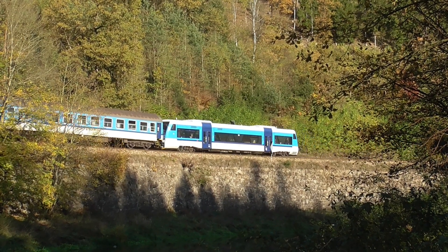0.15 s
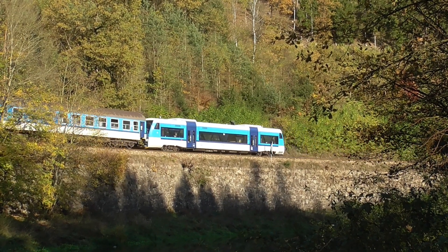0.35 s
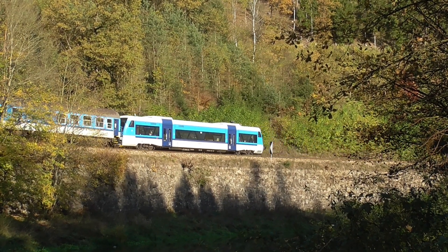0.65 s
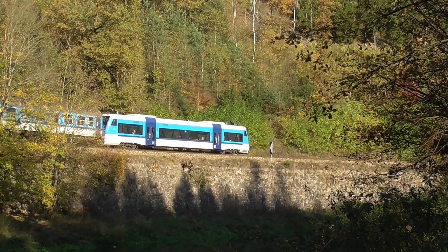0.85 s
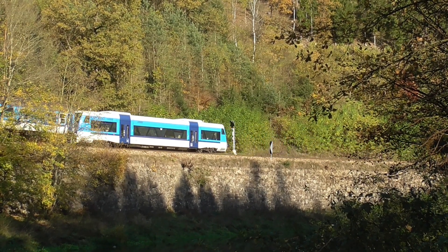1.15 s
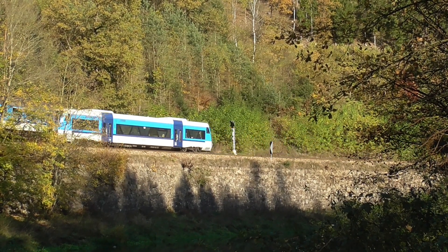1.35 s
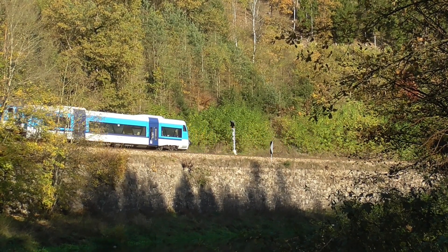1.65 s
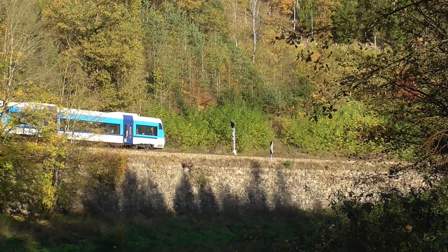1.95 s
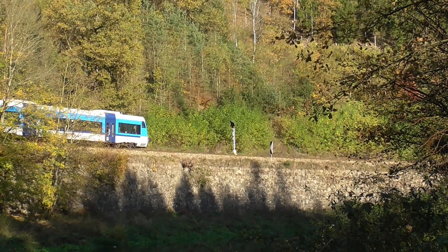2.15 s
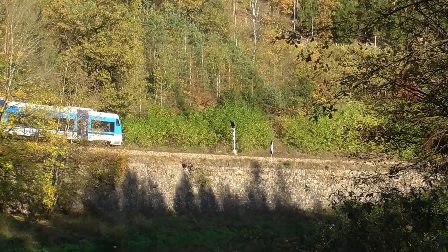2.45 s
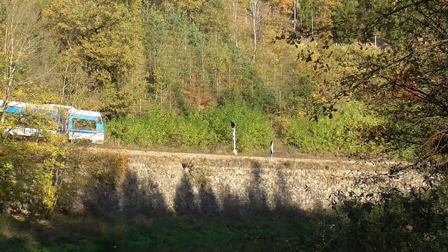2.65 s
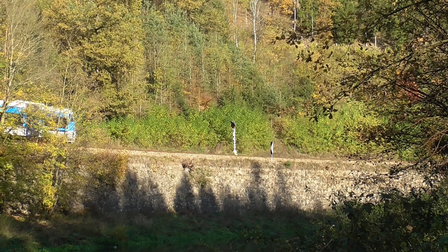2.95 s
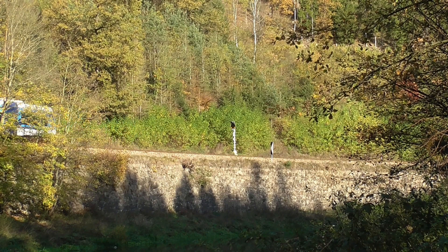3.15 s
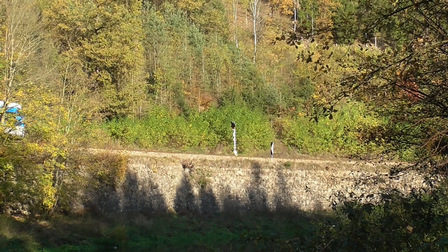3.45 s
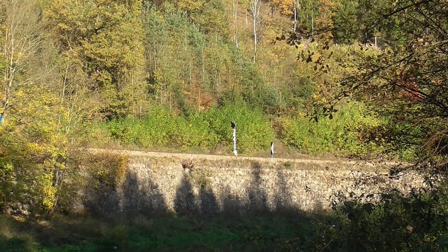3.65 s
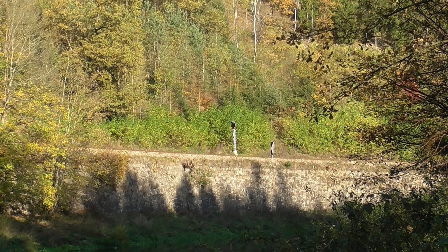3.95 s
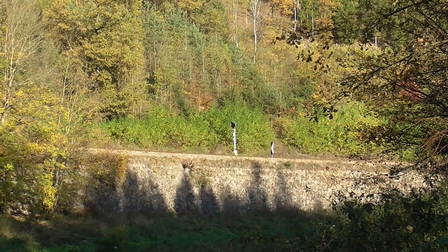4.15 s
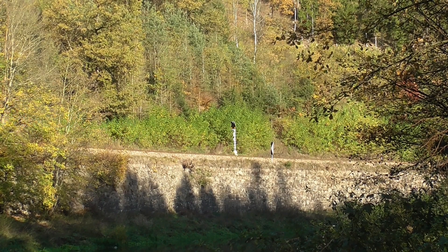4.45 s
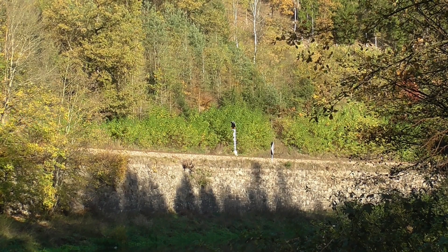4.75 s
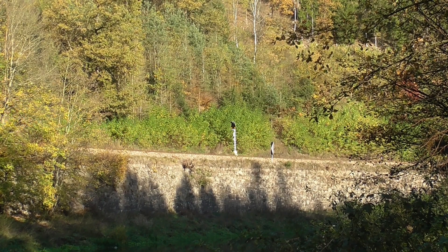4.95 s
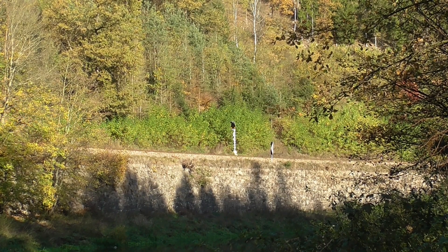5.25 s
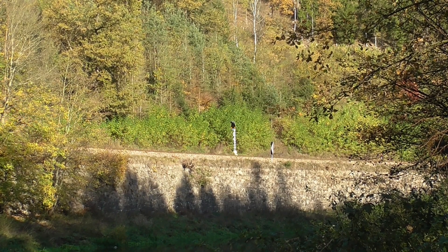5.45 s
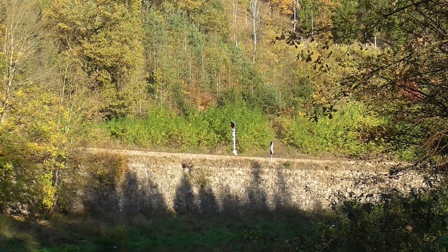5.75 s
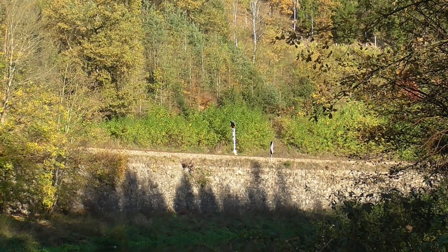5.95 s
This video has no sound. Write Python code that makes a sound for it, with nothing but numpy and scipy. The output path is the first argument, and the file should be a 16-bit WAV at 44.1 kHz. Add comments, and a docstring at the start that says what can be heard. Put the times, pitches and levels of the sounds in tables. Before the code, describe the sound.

Wheel flanges sing and screech through an echoing forest while a diesel drones and rolling rumble grows; the squeal jumps much higher halfway through.

```python
"""Diesel train on a tight curve

Across a wooded valley, slipping wheels sing in several self-excited modes, and brief chirps join them.
The trees scatter each sustained tone into a rough Doppler halo; near paths beat with it.
A diesel drones in harmonics of its firing rate. Coloured noises make the rumble, roar, boom and rolling,
and flange friction hisses through wheel resonances; the train grows louder as it comes nearer."""
import sys
import numpy as np
from scipy import signal
from scipy.fft import rfft, irfft
from scipy.io import wavfile
from scipy.ndimage import uniform_filter1d, map_coordinates

SR = 44100
rng = np.random.default_rng(int(sys.argv[2]) if len(sys.argv) > 2 else 0)


def unload_audio(sound):
    """Save the sound as a 16-bit wav file, at the path given as the first command line argument."""
    columns = np.transpose(np.atleast_2d(sound))
    # keep every value between -1 and 1, then stretch to whole-number steps
    steps = np.round(np.clip(columns, -1, 1) * 32767)
    wavfile.write(sys.argv[1], SR, steps.astype(np.int16))


N = 269010
TIME = np.arange(N) / SR
FREQ = np.maximum(np.fft.rfftfreq(N, 1 / SR), 1)


def undb(db):
    """Logarithmic level law: decibels to amplitude gain."""
    return 10 ** (np.asarray(db) / 20)


def unit(x):
    """Power normalisation: scale to rms 1."""
    return x / np.sqrt(np.mean(np.abs(x) ** 2))


def curves(table):
    """Linear interpolation in time of each column, with corners rounded by a 50 ms moving average."""
    s, *columns = np.transpose(table)
    return [uniform_filter1d(np.interp(TIME, s, column), size=SR // 20) for column in columns]


def across(table, hz=FREQ):
    """Linear interpolation of a table on a logarithmic frequency axis."""
    f, value = np.transpose(table)
    return np.interp(np.log(hz), np.log(f), value)


def scatter(gain):
    """Superposition of countless echoes, weighted by frequency shift: a complex envelope of rms 1."""
    random_phases = np.exp(2j * np.pi * rng.random(len(gain)))
    return unit(np.fft.ifft(gain * random_phases))


def fading(width_hz):
    """Beating of paths with nearly the same Doppler shift: a slow complex envelope."""
    beat_hz = np.fft.fftfreq(N // 64, 64 / SR)
    slow = scatter(np.exp(-.5 * (beat_hz / width_hz) ** 2))
    return np.interp(TIME, np.linspace(0, TIME[-1], len(slow)), slow)


def walk(rate):
    """Band-limited Gaussian fluctuation of rms 1, changing about rate times a second."""
    return unit(fading(rate).real)


# likeness of left and right for a sound fully aside: pitch_hz, likeness (0-1)
LIKENESS = [(40, .92), (130, .98), (300, .96), (700, .91), (1300, .8), (2200, .58), (4500, .45),
            (7500, .34), (10000, .22), (15000, .25)]
# level difference for a sound fully aside: pitch_hz, left_minus_right_db
BALANCE = [(60, 0.5), (300, 0), (700, 2), (2400, 4.5), (4400, 3), (6000, 0), (8000, 0), (15000, -1)]
# phase difference for a sound fully aside: pitch_hz, left_lead_rad
LEAD = [(40, 0), (250, .1), (700, .65), (1400, .8), (2500, 1.0), (4600, 1.4), (7800, 2.75), (11000, 3.1),
        (14000, 4.2)]


def ports(common, apart, hz, aside=1):
    """Interaural level, phase and coherence: the further aside (0-1), the less alike left and right."""
    like = np.clip(1 - aside ** 2 * (1 - across(LIKENESS, hz)), 0, 1)
    level = undb(aside * across(BALANCE, hz) / 2)
    turn = level * np.exp(1j * aside * across(LEAD, hz) / 2)
    mid = np.sqrt((1 + like) / 2) * common
    side = np.sqrt((1 - like) / 2) * apart
    return np.array([(mid + side) * turn, (mid - side) / turn])


def noise(colour_db):
    """Spectral shaping of white noise: partly coherent stereo noise of rms 1."""
    common, apart = rfft(rng.standard_normal((2, N))) * undb(colour_db)
    return unit(irfft(ports(common, apart, FREQ), N))


def slips(table, attack_s):
    """Stick-slip excitation: each slip builds up, holds and decays exponentially; powers add."""
    power = 0
    for start, end, db, release_db_per_s in table:
        attack = np.clip((TIME - start) / attack_s, 0, 1)
        decay_db = release_db_per_s * np.maximum(TIME - end, 0)
        power = power + (attack * undb(db - decay_db)) ** 2
    return np.sqrt(power)


ECHO_SPREAD_S = 0.34  # averaging time of the echoes


def lingering(gain):
    """Multipath energy averaging: paths of many lengths even out a tone's swells."""
    return np.sqrt(np.abs(uniform_filter1d(gain ** 2, size=int(ECHO_SPREAD_S * SR))))


# echoes from the trees: frequency_ratio (share of the tone's), relative_level_db
HALO = [(.89, -40), (.925, -24), (.946, -12), (.975, -6), (.995, 0), (1.005, -2), (1.02, -13), (1.045, -20),
        (1.075, -30), (1.1, -42)]
# raised echo from the trees ahead of the train: time_s, level_db (relative to the other echoes)
AHEAD = [(0, -32), (.45, -16), (.85, -7), (1.6, -11.5), (2.3, -13), (3, -12), (4.7, -14), (5.2, -12),
         (5.7, -9), (6.1, -20)]
AHEAD_WIDTH = 0.013  # Gaussian width as a share of the pitch
FLUTTER_HZ = 30


def squeal(hz, gain, echo, aside, ahead, beat_db, beat_hz, waver_hz, flutter_db, twin=0):
    """Self-excited wheel mode: a direct tone, beating near paths and Doppler-scattered echoes."""
    centre = np.mean(hz)
    shift = np.fft.fftfreq(N, 1 / SR) / centre
    share, echo_db = np.transpose(HALO)
    halo = undb(np.interp(1 + shift, share, echo_db, left=-np.inf, right=-np.inf))
    # trees that the train runs towards answer higher
    raised = np.exp(-.5 * ((shift - ahead) / AHEAD_WIDTH) ** 2)
    raised_gain = undb(curves(AHEAD)[0])
    echo = echo * undb(flutter_db * walk(FLUTTER_HZ))

    def paths():
        """Multipath superposition of the near paths and the tree echoes."""
        near = gain * undb(beat_db) * fading(beat_hz)
        return near + echo * (scatter(halo) + raised_gain * scatter(raised))

    common, apart = paths(), paths()
    phase = 2 * np.pi * np.cumsum(hz + waver_hz * walk(11.3)) / SR
    # even the direct tone twinkles between the sides as the wheel moves behind the branches
    envelope = ports(gain * (1 + twin) + common, gain * fading(14.0) + apart, centre, aside)
    return np.sqrt(2) * (envelope * np.exp(1j * phase)).real


# soft singing and flares: start_s, end_s, level_db, release_db_per_s
LOW_SLIPS = [(-.1, 3.25, -43, 150), (-.1, 0.022, -34.5, 84), (.21, 0.32, -34, 63), (.45, 1.0, -43, 60),
             (1.01, 1.15, -36, 152), (1.13, 1.2, -35.5, 68), (1.43, 1.45, -39.5, 70),
             (1.54, 1.76, -32, 130), (1.78, 1.7, -35, 90), (2.06, 2.62, -37, 105), (2.79, 3.28, -35.5, 330)]
# centre of the wavering pitch: time_s, pitch_hz
LOW_PITCH = [(0, 1883), (1.7, 1880), (2.3, 1874), (3.3, 1867)]


def low_mode():
    """Low wheel resonance driven by stick-slip, with soft singing and brief flares."""
    gain = slips(LOW_SLIPS, attack_s=0.067) * undb(0.5 * walk(6.8))
    echo = lingering(gain) * undb(-5.0)
    return squeal(curves(LOW_PITCH)[0], gain, echo, aside=0.32, ahead=0.048, beat_db=-17,
                  beat_hz=24, waver_hz=2.5, flutter_db=2.5)


MODE_ATTACK_S = 0.15  # build-up of the middle and upper modes
# holds and renewed catches, before the turn swell: start_s, end_s, level_db, release_db_per_s
MID_SLIPS = [(-.2, 1.31, -29, 90), (1.3, 2.26, -30, 26), (1.97, 2.105, -30, 72), (2.9, 3.2, -37.5, 70),
             (3.32, 3.47, -29.5, 87), (3.6, 6.1, -53, 60)]
# centre of the wavering pitch: time_s, pitch_hz
MID_PITCH = [(0, 3746), (.9, 3737), (1.7, 3724), (2.3, 3704), (2.7, 3695), (2.95, 3738), (3.55, 3730),
             (4.2, 3690)]
WHEEL_TURN_S, FIRST_SWELL_S, TURN_SWELL_DB = .29, .08, 2
TWIN_BELOW_HZ, TWIN_DRIFT_HZ, TWIN_DB = 27, 12, -13  # mean offset, rms drift, relative level


def middle_mode():
    """Amplitude modulation once per wheel turn, and beats with the axle's slightly lower twin wheel."""
    turn = np.cos(2 * np.pi * (TIME - FIRST_SWELL_S) / WHEEL_TURN_S)
    gain = slips(MID_SLIPS, MODE_ATTACK_S) * undb(TURN_SWELL_DB * turn)
    below_hz = TWIN_BELOW_HZ + TWIN_DRIFT_HZ * walk(2.985)
    twin = undb(TWIN_DB) * np.exp(-2j * np.pi * np.cumsum(below_hz) / SR)
    echo = lingering(gain) * undb(-2.0)
    return squeal(curves(MID_PITCH)[0], gain, echo, aside=0.55, ahead=0.048, beat_db=-15,
                  beat_hz=40, waver_hz=2.64, flutter_db=0.55, twin=twin)


# soft ringing: start_s, end_s, level_db, release_db_per_s
UPPER_SLIPS = [(-.2, 3.55, -56, 40), (.05, 0.31, -52, 80), (.5, 1.3, -49, 60), (2.2, 2.87, -44, 45)]
# centre of the wavering pitch: time_s, pitch_hz
UPPER_PITCH = [(0, 4480), (1.3, 4473), (2.6, 4459), (3.5, 4442)]


def upper_mode():
    """Softer wheel resonance above the middle one, driven by stick-slip."""
    gain = slips(UPPER_SLIPS, MODE_ATTACK_S)
    return squeal(curves(UPPER_PITCH)[0], gain, lingering(gain), aside=0.6, ahead=.015, beat_db=-13,
                  beat_hz=25, waver_hz=2.9, flutter_db=1.2)


# direct tone, building up as its wheel enters the curve: time_s, level_db
HIGH_LEVEL = [(0, -72), (1.55, -64), (1.85, -50.5), (2.35, -47), (2.75, -52), (2.84, -32), (2.98, -27),
              (3.1, -31), (3.24, -31.5), (3.35, -24.5), (3.6, -28.5), (3.75, -32.5), (3.95, -27.5),
              (4.08, -22), (4.24, -25.5), (4.49, -32), (4.58, -19.5), (4.69, -35), (4.82, -31.5),
              (4.98, -38), (5.1, -28), (5.29, -30), (5.53, -29.5), (5.61, -35), (5.82, -25), (5.92, -37),
              (6.1, -50)]
# slower swells of the echoes, before flutter: time_s, level_db
HIGH_ECHO = [(0, -59), (1.55, -53), (2.35, -43), (2.87, -32), (4.55, -32), (4.77, -40), (5.1, -31),
             (5.6, -31.5), (6.1, -42.5)]
# centre of the wavering pitch: time_s, pitch_hz
HIGH_PITCH = [(0, 7958), (1.7, 7922), (2.3, 7905), (2.9, 7880), (3.5, 7855), (4.2, 7832), (4.6, 7815),
              (4.88, 7792), (5.05, 7858), (5.5, 7830), (6.1, 7792)]


def high_mode():
    """Shrill wheel resonance whose direct tone and echoes have separate envelopes."""
    gain, echo = undb(curves(HIGH_LEVEL)[0]), undb(curves(HIGH_ECHO)[0])
    return squeal(curves(HIGH_PITCH)[0], gain, echo, aside=0.97, ahead=0.028, beat_db=-14.5,
                  beat_hz=28, waver_hz=3.0, flutter_db=1.0)


# the train comes nearer: time_s, level_db (relative)
APPROACH = [(0, -13), (.32, -9), (.48, -13), (.75, -10), (1.5, -12.5), (2.33, -11), (2.8, -3), (3.07, -6.5),
            (3.28, -4.5), (3.5, -6.5), (3.65, -5.5), (3.85, -3.5), (4.2, -5), (4.42, -2), (4.62, -1.5),
            (4.85, -2), (5.07, 0.8), (5.25, -2.5), (5.45, -3), (5.6, -.7), (5.93, -2), (6.07, 1.5)]


def nearing(law):
    """Distance law: the level in dB follows the approach in proportion."""
    db, growth = law
    return db + growth * curves(APPROACH)[0]


# engine speed, before a slight waver: time_s, firing_rate_hz
FIRING = [(0, 82.1), (2.5, 82.3), (4.4, 82.8), (6.1, 83)]
# exhaust tones: multiple_of_firing_rate, trim_db
ORDERS = [(3, -.5), (4, -0.5), (8, 0.5), (12, 1)]
# throbbing of the lowest tone as it comes across the valley, before trim: time_s, level_db
LOW_DRONE = [(0, -31), (.3, -37), (1.2, -35), (1.65, -44), (1.9, -40), (2.05, -30.5), (2.25, -41),
             (2.66, -36), (2.759, -24.5), (2.871, -22), (3.1, -37.5), (3.19, -24.5), (3.26, -36),
             (3.332, -21.5), (3.46, -39), (3.55, -23.5), (3.628, -36), (3.821, -35), (3.92, -20.5),
             (3.99, -25), (4.07, -54), (4.25, -36), (4.55, -29.5), (5.0, -28.5), (5.45, -42), (6.1, -35)]
# higher tones that come and go, before trim: time_s, low_level_db, middle_level_db, top_level_db
DRONE = [(0, -32.5, -41, -50), (0.299, -37, -29.5, -37), (.5, -32.5, -42.5, -44), (.8, -31, -42, -46.5),
         (1.75, -49, -43.5, -51), (2.05, -43, -48.5, -47), (2.55, -45.5, -38, -40.5),
         (2.87, -35, -38.5, -35), (3.25, -39, -30.5, -40), (3.5, -55, -35.5, -38.5),
         (3.85, -29, -33.5, -31.5), (4.17, -41, -37.5, -36), (4.45, -47, -27.5, -35),
         (5.05, -30, -31, -38.5), (5.45, -31, -30.5, -60), (6.1, -30, -27, -60)]
# colour of the roar: pitch_hz, relative_level_db
ROAR = [(30, -32), (160, -34), (225, -3.5), (280, -3.5), (325, -0.5), (410, 1), (470, -4.5), (550, -23),
        (900, -69)]
# roar: level_db (at approach 0 dB), growth (dB per dB of approach)
ROAR_LAW = (-24.5, 0.61)


def diesel():
    """Harmonics of the firing rate, blurred by the valley, over noise modulated by each firing."""
    firing_hz = curves(FIRING)[0]
    wavering_hz = firing_hz * (1 + 0.002894 * walk(2.84))
    phase = 2 * np.pi * np.cumsum(wavering_hz) / SR
    throb = 1 + 0.043 * np.cos(phase)
    out = noise(across(ROAR)) * throb * undb(nearing(ROAR_LAW) + 0.26 * walk(5.2))
    levels_db = curves(LOW_DRONE) + curves(DRONE)
    for (order, trim_db), drone_db in zip(ORDERS, levels_db):
        blur = ports(1 + 0.89 * fading(17), 1.45 * fading(3.6), order * np.mean(firing_hz))
        tone = blur * np.exp(1j * order * phase)
        out = out + unit(tone.real) * undb(trim_db + drone_db)
    return out


# colours of embankment, coach bodies, sleepers and rails: pitch_hz, relative_level_db
RUMBLE = [(12, -44), (30, -28), (45, -24), (60, -1.5), (80, -3), (105, 4), (135, -3), (180, 1.5),
          (300, -37)]
BOOM = [(90, -31), (135, -7.5), (165, -2), (190, 2), (220, -4.5), (260, -15), (310, 4), (360, -38),
        (600, -43)]
ROLLING = [(300, -21), (470, 1), (560, -1), (680, 2), (790, 3.5), (910, -1), (990, -3.5), (1100, -5.5),
           (1400, -50)]
RAIL = [(800, -12), (1150, 2), (1320, 5), (1520, -1.5), (1750, -2), (2150, -2.5), (2650, -9.5), (3200, -11),
        (4200, -10), (6000, -25.5), (12000, -50)]
# layer levels: level_db (at approach 0 dB), growth (dB per dB of approach)
RUMBLE_LAW = (-36, 1.0)
ROLLING_LAW = (-22, 1.115)
RAIL_LAW = (-32, 0.76)
# surges of the coach bodies, before random fluctuation: time_s, level_db
BOOM_LEVEL = [(0, -49), (1.8, -58), (2.3, -51), (2.8, -38), (3.3, -37.5), (3.55, -37.5), (4.15, -31),
              (4.5, -28.5), (4.7, -25), (4.88, -29.5), (5.15, -25.5), (5.33, -26), (5.46, -33.5),
              (5.6, -23.5), (5.92, -28), (6.1, -20)]


def running_gear():
    """Roughness excitation: treads shake the embankment, coach bodies, sleepers and rails."""
    rumble = noise(across(RUMBLE)) * undb(nearing(RUMBLE_LAW) + 1.2 * walk(11.0))
    boom = noise(across(BOOM)) * undb(curves(BOOM_LEVEL)[0] + 1.0 * walk(10))
    rolling = noise(across(ROLLING)) * undb(nearing(ROLLING_LAW) + 1.35 * walk(16.4))
    rail = noise(across(RAIL)) * undb(nearing(RAIL_LAW) + 1.33 * walk(20))
    return rumble + boom + rolling + rail


# how strongly the grinding flanges are heard, before layer offsets: time_s, level_db
GRINDING = [(0, -63), (.3, -59.5), (.48, -63), (.8, -59), (1.45, -62), (2.3, -56.5), (2.78, -49.5),
            (3.05, -53), (3.5, -51.5), (3.88, -46), (4.25, -48.5), (4.65, -50), (4.95, -48.5), (5.45, -50),
            (5.8, -49), (6.1, -56)]
# colours of the hiss and of the topmost hiss: pitch_hz, relative_level_db
HISS = [(2000, -14), (3500, 1.5), (5200, 3), (6450, -2), (7200, 5), (8400, 5.5), (9200, 0.5), (9600, 2.5),
        (10350, 2), (10700, -0.5), (11200, -2), (11700, 0), (12400, -15), (15400, -28)]
SIZZLE = [(9000, -23), (12000, -7), (12700, 7), (14000, -2), (14500, -9), (15400, -5)]
# wheel resonances before the Doppler glide: pitch_hz, width_hz, relative_level_db
WHEEL = [(1800, 70, 4), (2480, 55, 14), (2790, 32, 12.5), (3370, 120, 5), (3675, 90, 5), (4330, 110, 5),
         (4430, 60, 5), (4770, 34, 5.5), (5260, 34, 2), (5745, 60, 6.5), (6195, 80, 1.5), (6760, 110, 4.5),
         (8770, 80, 4.5), (9510, 130, 1.5), (10860, 130, 0), (11680, 140, 1.5)]


def flanges():
    """Friction noise on the outer rail, with part of it filtered by Lorentzian wheel resonances."""
    grinding_db = curves(GRINDING)[0]
    hiss = noise(across(HISS)) * undb(grinding_db + 9.0 + 1.8 * walk(17))
    ring_power = sum(undb(db) ** 2 / (1 + (2 * (FREQ - hz) / width) ** 2) for hz, width, db in WHEEL)
    rung = noise(across(HISS) + 10 * np.log10(ring_power))
    # the Doppler shift pulls the resonances slowly down
    emitted = np.cumsum(1 - .004 * (TIME - 4))
    ringing = np.array([map_coordinates(side, [emitted], order=3, mode="mirror") for side in rung])
    ringing = ringing * undb(grinding_db + 11.5 + 1.4 * walk(6.4))
    # air absorption dulls the far train's treble, so the topmost hiss rises faster as it nears
    sizzle = noise(across(SIZZLE)) * undb(1.74 * grinding_db + 38.5)
    return hiss + ringing + sizzle


# modes that catch for a moment: start_s, end_s, pitch_hz (midway), level_db (rms before the swell),
# echo_db (relative to the tone)
CHIRPS = [(2.56, 2.92, 5712, -41.5, -11), (2.45, 3.0, 4780, -50, -8), (2.1, 2.95, 4708, -51, -8),
          (2.4, 3.5, 4350, -49, 3), (2.55, 2.95, 11765, -50, -6), (1.85, 3.2, 15120, -56, 1),
          (.15, 1.15, 7480, -56, -3), (4.75, 5.1, 8758, -43, -8), (4.75, 4.97, 6850, -44, -8),
          (5.08, 5.42, 7350, -47, -8), (5.75, 6.15, 5820, -52, -6), (5.7, 6.15, 3690, -46, -3)]
CHIRP_BLUR = .009  # echo lowering and width, as a share of the pitch


def chirps():
    """Briefly excited modes: half-sine swells with a Doppler glide and a blurred echo just below."""
    out = np.zeros((2, N))
    for start, end, hz, db, echo_db in CHIRPS:
        on = (TIME > start) & (TIME < end)
        t = TIME[on]
        swell = np.sin(np.pi * (t - start) / (end - start))
        pitch = hz * (1 - 0.0042 * (t - (start + end) / 2))  # the Doppler shift keeps sinking
        blur_hz = CHIRP_BLUR * hz
        echo = undb(echo_db) * fading(blur_hz)[on] * np.exp(-2j * np.pi * blur_hz * t)
        envelope = ports(1 + .3 * fading(15)[on] + echo, fading(15)[on], hz)
        tone = envelope * np.exp(2j * np.pi * np.cumsum(pitch) / SR)
        out[:, on] += unit(tone.real) * swell * undb(db)
    return out


def scene():
    """Linear superposition of wheel modes, diesel, running gear, flanges and chirps."""
    modes = low_mode() + middle_mode() + upper_mode() + high_mode()
    return modes + diesel() + running_gear() + flanges() + chirps()


TOP_HZ = 15200


def record(dry):
    """Band limitation: a steep elliptic low-pass removes the extreme treble."""
    return signal.sosfilt(signal.ellip(10, .1, 90, TOP_HZ, fs=SR, output="sos"), dry)


dry = scene()
out = record(dry)
unload_audio(out)
```